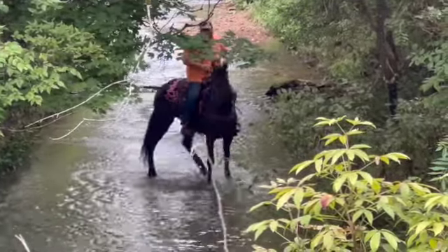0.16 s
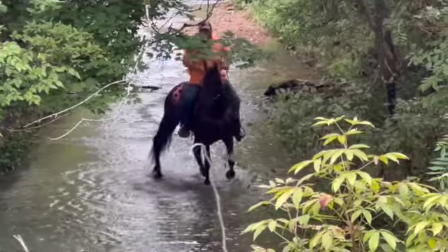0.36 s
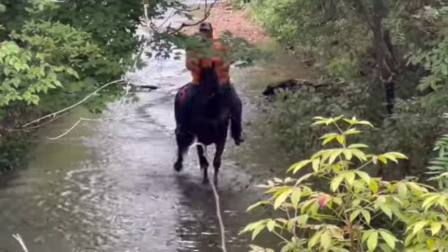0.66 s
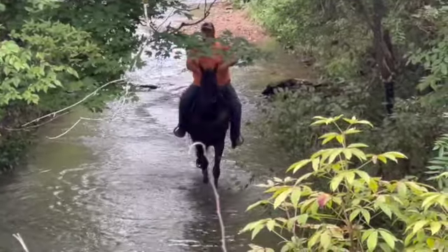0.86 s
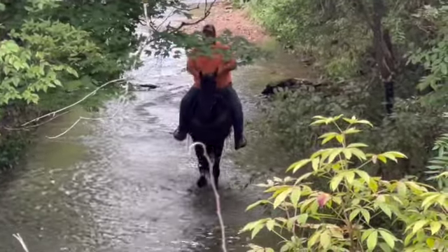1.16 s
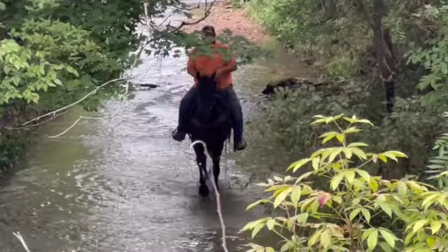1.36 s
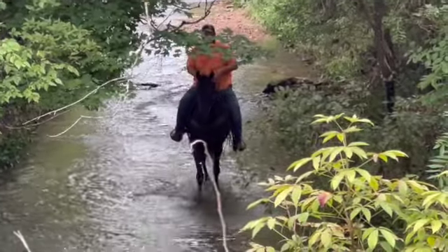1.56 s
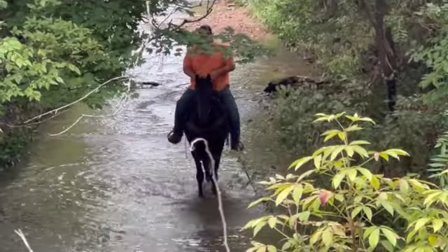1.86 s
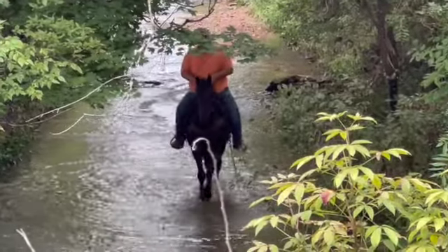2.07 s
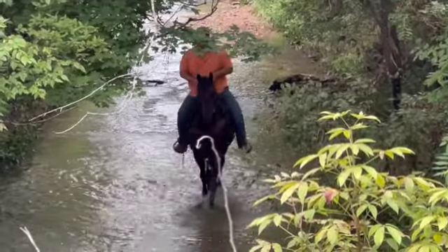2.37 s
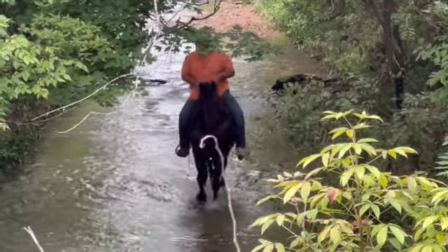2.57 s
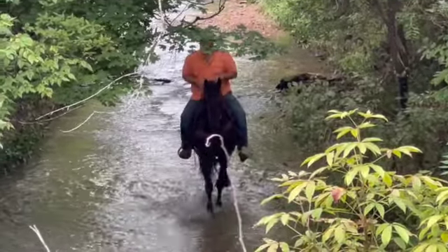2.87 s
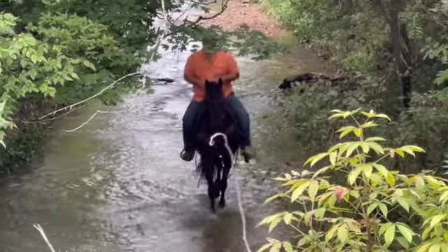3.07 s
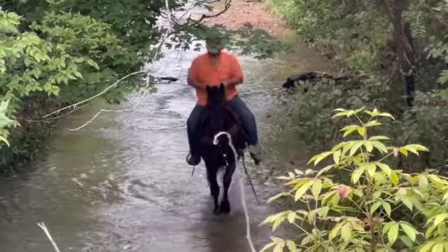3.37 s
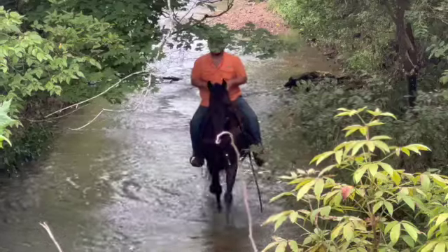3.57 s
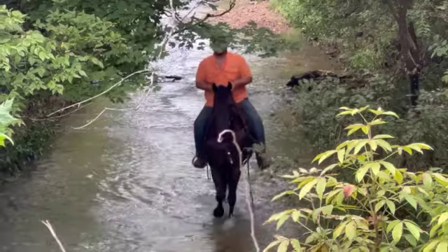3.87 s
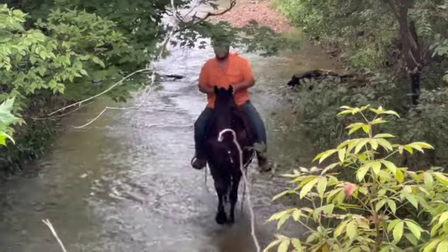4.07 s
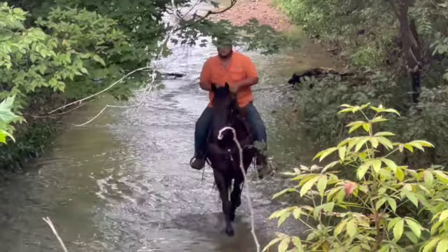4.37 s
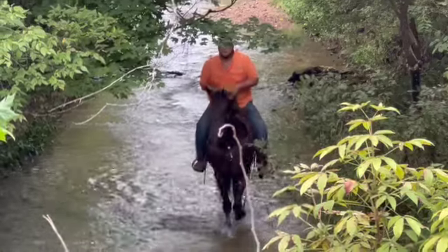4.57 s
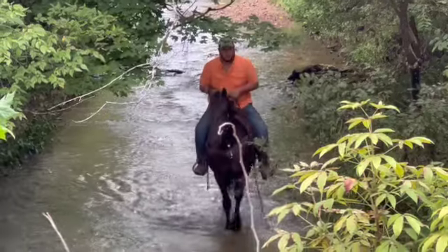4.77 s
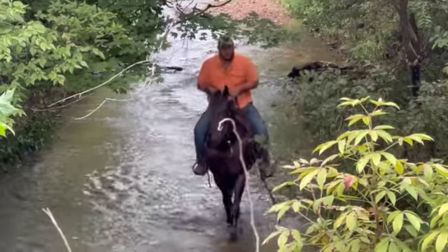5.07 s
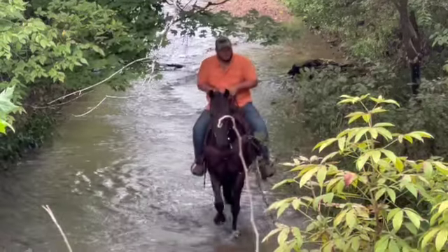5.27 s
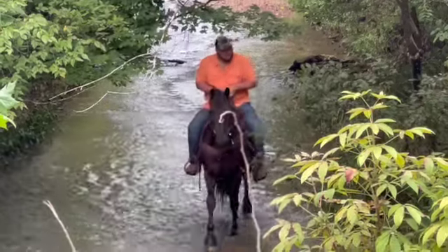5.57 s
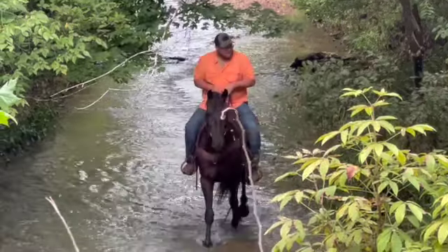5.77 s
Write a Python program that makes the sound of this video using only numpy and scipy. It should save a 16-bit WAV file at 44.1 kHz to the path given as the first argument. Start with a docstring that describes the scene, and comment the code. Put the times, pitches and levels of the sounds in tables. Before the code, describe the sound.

A horse wades through a shallow wooded creek for about six seconds. Throughout, a thin, high insect drone holds nearly steady with a faint throb, over the soft, patchy wash of running water, small bubbling gurgles and fine fizz. Hooves plunge with short, hollow, mid-pitched plops that drop in pitch, plus light slaps of spray. Three come almost together within the first 0.15 s, then one near 0.8, 1.2, a pair around 1.55, then 2.0 and 2.3. A heavier plunge with a low thud lands near 2.6, another plop follows at 2.95. Legs slosh around 3.3 to 3.6, with dull gravel shifts at 3.4; steps follow at 3.65, 4.0 and a weak one at 4.35. Sloshing and spatter crowd 4.6 to 5.3, with a plop at 5.0, the strongest, crisp plop at 5.33 and a last at 5.75. Occasional drips fall between. Nearly centred horse, faint short bank echoes.

```python
"""A shallow creek in summer woods: a horse wades toward a hand-held camera.
Each hoof traps pockets of air that plop as gliding, dying sines, slaps up spray and thuds on the bed;
between steps the legs slosh, as bursts of coloured random drops.
The creek is patchy shaped noise with small ringing bubbles and a fine fizz; echoes return from the banks.
Insects drone in the trees, mostly between 6 and 7.5 kHz, as one narrow, faintly throbbing band of noise."""
import sys
import numpy as np
from scipy import signal
from scipy.fft import rfft, irfft
from scipy.io import wavfile
from scipy.ndimage import uniform_filter1d

SR = 44100
rng = np.random.default_rng(int(sys.argv[2]) if len(sys.argv) > 2 else 0)


def dump(signal):
    """Clip the signal to [-1, 1] and save it as 16-bit WAV at the path in sys.argv[1]."""
    limited = np.clip(np.atleast_2d(signal).T, -1, 1)
    pcm = np.round(limited * 32767).astype(np.int16)
    wavfile.write(sys.argv[1], SR, pcm)


N = 260631
BINS = np.fft.rfftfreq(N, 1 / SR)

# Hooves plunging in. Each row: start in seconds, plop level in dB, plop pitch in Hz, plop t60 in seconds,
# small pocket level in dB, gulp level in dB, gulp pitch in Hz, splash level in dB, thud level in dB.
HOOF_STEPS = [(.019, -14, 750, 0.019, -26, -36, 620, -41.5, -63),
              (0.1254, -19, 583, 0.029, -20.5, -55, 410, -43.5, -36),
              (.137, -14, 687, 0.013, -43, -37, 574, -55, -43),
              (.828, -15.5, 865, .02, -31.5, -23.5, 476, -38, -56),
              (1.201, -17.5, 713, 0.011, -30, -55, 498, -41, -33),
              (1.532, -23, 860, 0.0061, -36.5, -42, 560, -49, -59),
              (1.587, -17.5, 498, 0.02, -26.5, -28.5, 717, -43, -45),
              (1.999, -25, 670, 0.0066, -56, -40.5, 387, -44, -36),
              (2.334, -20.5, 770, 0.022, -41, -28, 351, -39, -41),
              (2.567, -13, 527, 0.035, -23, -25, 426, -34, -27),
              (2.9494, -15.5, 616, 0.04, -22.5, -26.5, 707, -37.5, -60),
              (3.638, -16, 463, 0.018, -27.5, -38, 566, -42.5, -42),
              (3.968, -18.5, 636, 0.034, -34.5, -25, 386, -38, -39),
              (4.348, -31, 622, 0.04, -29, -31, 556, -41, -39),
              (4.985, -21, 713, 0.023, -23.5, -30, 410, -37.5, -44),
              (5.3298, -11, 782, 0.014, -39, -45, 590, -40, -36),
              (5.75, -21.5, 640, 0.023, -41, -25, 490, -38, -58)]
# Colour of the small drops. Each row: frequency in Hz, relative density in dB per Hz.
SPATTER_COLOUR = [(200, -41), (600, 9), (1000, 3.5), (1600, 6), (2100, -2.5), (3000, -17), (5000, -9),
                  (12000, -35)]


def gain_of(db):
    """Decibels to amplitude."""
    return 10 ** (np.asarray(db) / 20)


def evened(x):
    """Scales to rms 1."""
    return x / np.sqrt(np.mean(x ** 2) + 1e-20)


def read(points, hz):
    """Reads a table on a log-frequency axis, flat beyond its ends."""
    f, value = np.transpose(points)
    return np.interp(np.log(hz + 1), np.log(f + 1), value)


def add(mix, s, sound):
    """Mixes a sound in at s seconds."""
    part = mix[max(0, round(s * SR)):][:len(sound)]
    part += sound[:len(part)]


def coloured(x, spectrum):
    """Weights a signal by a spectrum, at rms 1."""
    return evened(irfft(rfft(x) * gain_of(read(spectrum, BINS)), N))


def drift(rate_hz):
    """Slow random wander of rms 1: noise with little left above the rate."""
    noise = rfft(rng.standard_normal(N))
    return evened(irfft(noise * np.exp(-(BINS / rate_hz) ** 2), N))


def ring(hz, t60, rise_cycles, glide=0):
    """A soft-started, dying sine whose pitch moves by the share glide."""
    t = np.arange(int(1.5 * t60 * SR) + 2) / SR
    pitch = hz * (1 + glide * (1 - np.exp(-3 * t / t60)))
    turns = np.cumsum(pitch) / SR
    onset = 1 - np.exp(-(t * hz / rise_cycles) ** 2)
    return onset * gain_of(-60 * t / t60) * np.sin(2 * np.pi * turns)


def surge(rise, t60):
    """An envelope that swells quickly and dies away, times in seconds."""
    age = np.arange(SR // 2) / SR
    return (1 - np.exp(-age / rise)) * gain_of(-60 * age / t60)


def drops(per_s, spread_db):
    """Random impacts of either sign; their sizes in dB scatter exponentially, up to three spreads."""
    size = gain_of(spread_db * np.minimum(rng.exponential(1, N), 3))
    sign = rng.choice([-1, 1], N)
    return size * sign * (rng.random(N) < per_s / SR)


def plops(rise_cycles=0.42, low_cut_hz=170):
    """Hooves trap a main, a smaller and a hollow air pocket, drips one; such small sources lack bass."""
    # Water falling back from the lifted legs. Each row: start in seconds, level in dB, pitch in Hz.
    drips = [(.21, -37, 390), (.716, -34, 456), (1.23, -29.5, 345), (2.346, -26.5, 525),
             (3.065, -32.5, 560), (3.608, -28.5, 564), (4.783, -28, 494)]
    plop_glide = -0.23  # share by which the pitch sinks as the cavity widens
    small_ratio, small_t60_s, small_glide = 1.86, 0.032, -0.27  # pitch relative to the plop
    gulp_delay_s, gulp_t60_s, gulp_glide = 0.00241, 0.0855, -0.448  # the hollow behind the hoof rings long
    drip_t60_s, drip_glide = 0.048, 0.044
    out = np.zeros(N)
    for s, db, hz, t60, small_db, gulp_db, gulp_hz, _, _ in HOOF_STEPS:
        main = ring(hz, t60, rise_cycles, plop_glide)
        small = ring(hz * small_ratio, small_t60_s, rise_cycles, small_glide)
        gulp = ring(gulp_hz, gulp_t60_s, rise_cycles, gulp_glide)
        add(out, s, gain_of(db) * main)
        add(out, s, gain_of(small_db) * small)
        add(out, s + gulp_delay_s, gain_of(gulp_db) * gulp)
    for s, db, hz in drips:
        add(out, s, gain_of(db) * ring(hz, drip_t60_s, rise_cycles, drip_glide))
    bass_loss = 1 - np.exp(-(BINS / low_cut_hz) ** 2)
    return irfft(rfft(out) * bass_loss, N)


def slaps(t60=0.026, rise=0.00076):
    """A hoof breaks the surface with a short burst of spray, as strong as its plunge."""
    lead_s, slap_db = 0.0019, -22  # before the plop; relative to the plop
    burst = np.zeros(N)
    for s, plop_db, *_ in HOOF_STEPS:
        add(burst, s - lead_s, gain_of(plop_db + slap_db) * surge(rise, t60))
    return dulled(burst * coloured(drops(per_s=2800, spread_db=0.5), SPATTER_COLOUR))


def dulled(x, top_hz=2360):
    """Heavy drops: a low-pass takes the treble off the slaps."""
    return signal.sosfilt(signal.butter(3, top_hz, fs=SR, output="sos"), x)


def splashes():
    """A low slosh and a brighter spatter swell with each push of a leg and fall back."""
    # Colour of the heaved water. Each row: frequency in Hz, relative density in dB per Hz.
    slosh_colour = [(80, -17), (200, -10.5), (330, 0.5), (550, 0), (850, -2), (1300, -24.5), (2600, -18),
                    (8000, -38)]
    # Legs swinging between steps. Each row: start in seconds, slosh level in dB, spatter level in dB.
    swishes = [(0.441, -39.5, -47), (2.622, -38.5, -55), (3.282, -34.5, -42), (3.45, -45, -50),
               (3.6, -39.5, -40), (4.04, -52, -53), (4.37, -39.5, -51), (4.582, -44, -38.5),
               (4.639, -35.5, -53), (4.728, -36.5, -57), (4.962, -36, -42), (5.02, -43, -46),
               (5.125, -37.5, -38.5), (5.181, -38.5, -38.5), (5.24, -60, -42.5), (5.418, -44, -52),
               (5.815, -53, -40)]
    bow_lead_s, bow_db = 0.0143, -4.5  # the leg pushes water ahead of the landing; relative to the splash
    spatter_db = -2.5  # spatter of the steps, relative to their slosh
    splash, swish = surge(rise=0.0015, t60=0.14), surge(rise=0.0021, t60=0.11)
    heave = np.zeros(N)
    for s, *_, splash_db, _ in HOOF_STEPS:
        add(heave, s - bow_lead_s, gain_of(splash_db + bow_db) * swish)
        add(heave, s, gain_of(splash_db) * splash)
    spray = gain_of(spatter_db) * heave
    for s, swish_slosh_db, swish_spatter_db in swishes:
        add(heave, s, gain_of(swish_slosh_db) * swish)
        add(spray, s, gain_of(swish_spatter_db) * swish)
    slosh = coloured(drops(per_s=700, spread_db=3.5), slosh_colour)
    spatter = coloured(drops(per_s=590, spread_db=-0.5), SPATTER_COLOUR)
    return heave * slosh + spray * spatter


def thuds(rise_cycles=0.42):
    """The weight of the horse lands and shifts on the gravel bed, as low dying sines."""
    # A planted hoof shifting on the gravel. Each row: start in seconds, level in dB, pitch in Hz.
    shifts = [(.454, -44, 90), (.502, -41.5, 149), (1.646, -41, 95), (3.375, -34, 81), (3.406, -37.5, 156),
              (4.947, -38.5, 122)]
    thud_hz, thud_t60_s, shift_t60_s = 147.7, 0.072, 0.11
    out = np.zeros(N)
    for s, *_, thud_db in HOOF_STEPS:
        add(out, s, gain_of(thud_db) * ring(thud_hz, thud_t60_s, rise_cycles))
    for s, db, hz in shifts:
        add(out, s, gain_of(db) * ring(hz, shift_t60_s, rise_cycles))
    return out


def churn(t, follow=0.58):
    """Decibels by which the stirred water departs from its usual level: a share of the table's swing."""
    # How strongly the stirred water churns. Each row: time in seconds, level in dB before the median is taken off.
    churn_levels = [(0.0, -49.5), (0.13, -47.5), (0.72, -49), (0.89, -47.5), (3.94, -46.5), (4.7, -47.5),
                    (5.08, -47), (5.9, -46)]
    s, db = np.transpose(churn_levels)
    return follow * np.interp(t, s, db - np.median(db))


def bubbles(per_s, low_hz, high_hz, cycles, spread_db, level_db, glide=0.24, count=36):
    """Small bubbles in the riffles, each rising in pitch as it nears the surface."""
    out = np.zeros((2, N))
    slots = 60  # chances for each pitch
    for hz in np.geomspace(low_hz, high_hz, count):
        bubble = ring(hz, cycles / hz, 0.9, glide) * (low_hz / hz) ** 0.16
        for when, size, side, chance in rng.random((slots, 4)):
            if chance < per_s * N / SR / count / slots:
                loud = gain_of(spread_db * min(-np.log(size), 3))
                add(out[0], when * N / SR, loud * (1 + side) * bubble)
                add(out[1], when * N / SR, loud * (2 - side) * bubble)
    return gain_of(level_db) * evened(out)


def creek(patchy_db=2.5, level_db=-46.87, smooth_above_hz=2500):
    """The wash of the stream: patches come and go in the gurgle, the far hiss stays smooth."""
    # Colour of the running water. Each row: frequency in Hz, relative density in dB per Hz.
    creek_colour = [(18, -38), (30, -19), (59, 1), (91, -1), (118, -2.5), (223, -11.5), (260, -6.5),
                    (296, -9), (345, -2.5), (385, -7.5), (478, -3.5), (961, -4.5), (1450, -3.5),
                    (2800, -12.5), (5500, -17), (7150, -66), (12100, -120)]
    # Likeness of left and right. Each row: frequency in Hz, coherence from 0 to 1.
    likeness = [(60, 1), (300, 0.94), (700, 0.99), (1500, 0.77), (2300, 0.98), (3100, 1)]
    window, hop = 1024, 256
    frames, hz = N // hop + 5, np.fft.rfftfreq(window, 1 / SR)
    a, b, c, d, patches = rng.standard_normal((5, frames, len(hz)))
    patches = uniform_filter1d(patches, size=6, axis=0)  # lasting in time
    patches = evened(uniform_filter1d(patches, size=8, axis=1))  # broad in frequency
    swell_db = churn(np.arange(frames)[:, None] * hop / SR)
    same = np.clip(read(likeness, hz), -1, 1)
    left = a + 1j * b
    right = same * left + np.sqrt(1 - same ** 2) * (c + 1j * d)
    unevenness_db = (patchy_db * patches + swell_db) / (1 + (hz / smooth_above_hz) ** 2)
    z = np.array([left, right]) * gain_of(unevenness_db)
    _, wash = signal.istft(z, nperseg=window, noverlap=window - hop, time_axis=1, freq_axis=2)
    return gain_of(level_db) * coloured(wash[:, :N], creek_colour)


def fizz(level_db=-57.0, swell_db=1.05):
    """Countless tiny drops and bursting bubbles make a faint, wavering hiss."""
    # Fine fizz of the riffles. Each row: frequency in Hz, relative density in dB per Hz.
    fizz_colour = [(1500, -38), (4500, -7.5), (6000, 1.5), (8200, 1.5), (9000, -1), (10000, -1),
                   (12000, -10.5), (14000, -11), (15000, -24), (16000, -26)]
    wavering = gain_of(level_db + swell_db * drift(7.6))
    return wavering * coloured(drops(per_s=17000, spread_db=3.0), fizz_colour)


def insects(throb_hz=39, throb_db=0.13, flutter_db=.5, swell_db=0.14, level_db=-46.32):
    """Many far singers blur into one band; the pulsing of the nearest makes it throb faintly."""
    # Colour of the chorus. Each row: frequency in Hz, relative density in dB per Hz.
    chorus_colour = [(4500, -52), (5600, -19.5), (6000, -14.5), (6330, -4.5), (6680, 1.5), (7150, 0.5),
                     (7380, -10), (7700, -17.5), (8300, -35.5)]
    strokes = np.cumsum(throb_hz * (1 + 0.013 * drift(2.9))) / SR
    throb = throb_db * np.sin(2 * np.pi * strokes)
    wobble_db = throb + flutter_db * drift(60) + swell_db * drift(1.8)
    return gain_of(level_db + wobble_db) * coloured(rng.standard_normal(N), chorus_colour)


def woods(x, alike=1.0):
    """Trunks and banks scatter the sound back as sparse echoes, partly shared by left and right."""
    # Ring of the wooded banks. Each row: frequency in Hz, t60 in seconds.
    bank_ring = [(150, 0.58), (600, 0.19), (2000, 0.28), (8000, 0.16)]
    taps = rng.standard_normal((3, SR)) * (rng.random((3, SR)) < 1500 / SR)  # 1500 echoes a second
    taps[:, :round(.008 * SR)] = 0  # no echo in the first 8 ms
    share = np.clip(alike, 0, 1)
    taps = np.sqrt(share) * taps[0] + np.sqrt(1 - share) * taps[1:]
    hz, t, z = signal.stft(taps, SR, nperseg=256)
    fade = gain_of(-60 * t / read(bank_ring, hz)[:, None])
    _, tail = signal.istft(z * fade, SR, nperseg=256)
    return signal.fftconvolve(x[None], tail / np.linalg.norm(tail[0]), axes=1)[:, :N]


def scene(woods_db=-15, horse_right_db=0.04):
    """The horse a hair right of centre, in the creek, under the insects."""
    horse = plops() + slaps() + splashes() + thuds()
    sides = np.array([[-1], [1]])  # left down, right up
    tinkle = bubbles(per_s=140, low_hz=873, high_hz=3070, cycles=29.4, spread_db=3.0, level_db=-58)
    lapping = bubbles(per_s=110, low_hz=432, high_hz=1670, cycles=10.8, spread_db=4, level_db=-54.5)
    stirred = (tinkle + lapping) * gain_of(churn(np.arange(N) / SR))
    water = creek() + stirred
    echoes = gain_of(woods_db) * woods(horse, alike=0.92)
    return horse * gain_of(horse_right_db * sides) + echoes + water + fizz() + insects()


def record(dry, low_cut_hz=31, narrow_above_hz=3000, edge_hz=15750):
    """Stereo finish: no deep bass, treble nearly mono, sides turned apart in phase above 9 kHz, a top limit."""
    # How the camera body sets its two microphones apart, below 4 kHz. Each row: frequency in Hz,
    # radians that left leads, dB that left is louder.
    ports = np.array([(520, 0.047, -0.5), (650, -0.27, -1.3), (774, 0.72, -3.5), (940, 0.12, 2),
                      (1050, 0.041, -2), (1600, 0.26, 0.6), (2500, 0, -0.5), (4000, 0, 0)])
    # Phase between the sides in the top treble. Each row: frequency in Hz, radians that left lags.
    top_turn = [(8800, 0), (9150, 1.7), (10000, 3.14), (10450, 3.14), (11600, 6.28), (12500, 6.28),
                (13500, 9.42), (14300, 9.42), (15000, 12.57)]
    spectra = rfft(dry)
    mid = spectra.mean(0)
    spectra = mid + (spectra - mid) / (1 + (BINS / narrow_above_hz) ** 4)
    half = np.array([[.5], [-.5]])  # left takes half of each difference, right the other half
    lead = read(ports[:, [0, 1]], BINS) - read(top_turn, BINS)
    louder_db = read(ports[:, [0, 2]], BINS)
    apart = np.exp(1j * lead * half) * gain_of(louder_db * half)
    bass_loss = 1 - np.exp(-(BINS / low_cut_hz) ** 4)
    wide = irfft(spectra * apart * bass_loss, N)
    top_limit = signal.firwin(511, edge_hz, window=("kaiser", 9), fs=SR)
    return signal.oaconvolve(wide, top_limit[None], "same")


dry = scene()
out = record(dry)
dump(out)
```